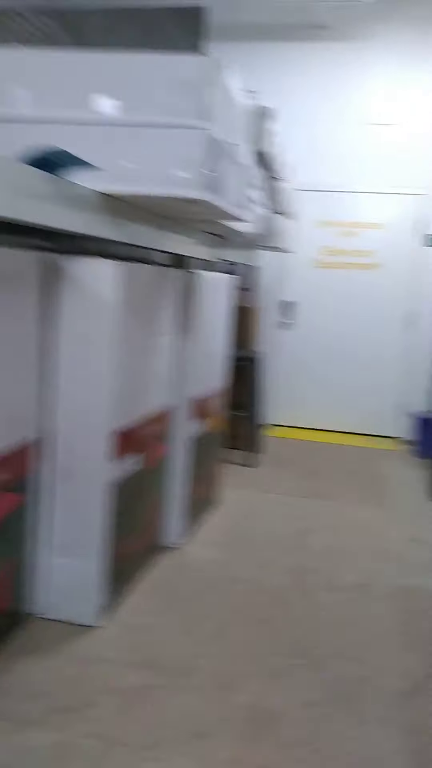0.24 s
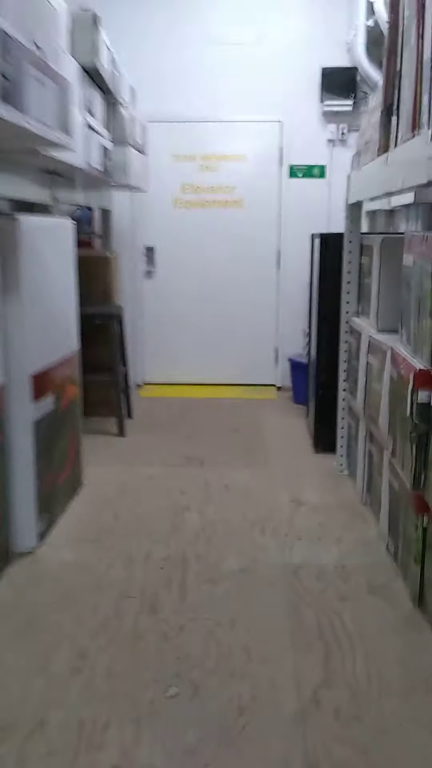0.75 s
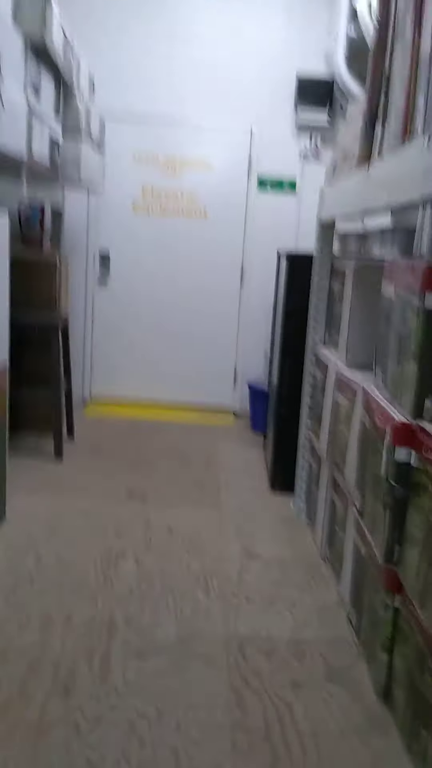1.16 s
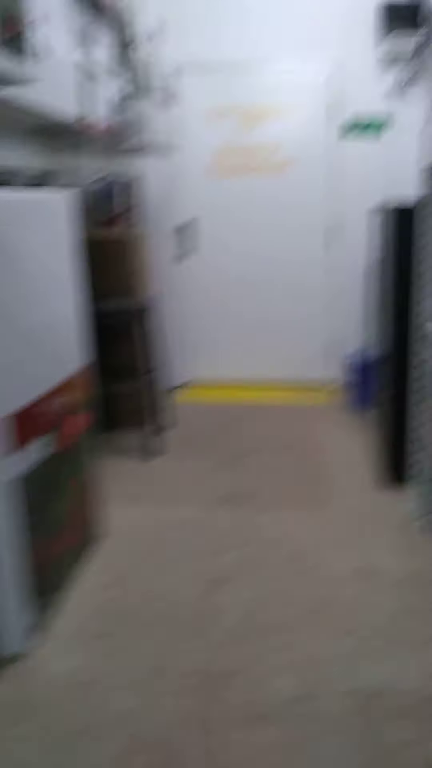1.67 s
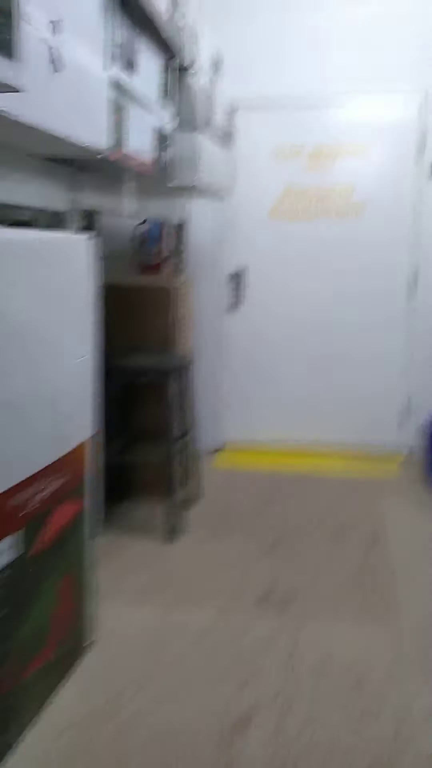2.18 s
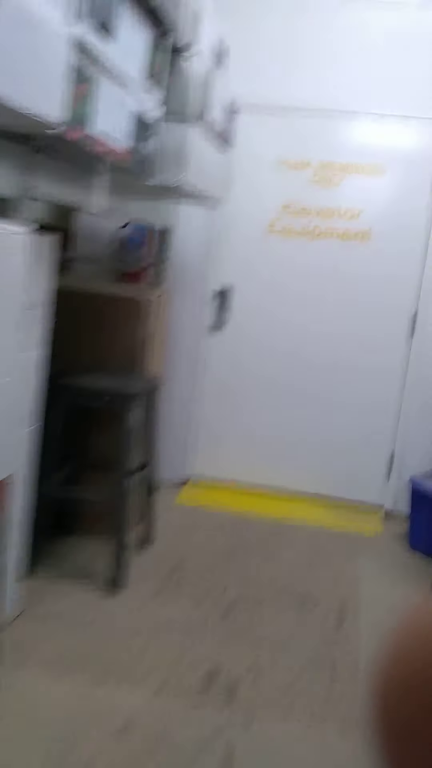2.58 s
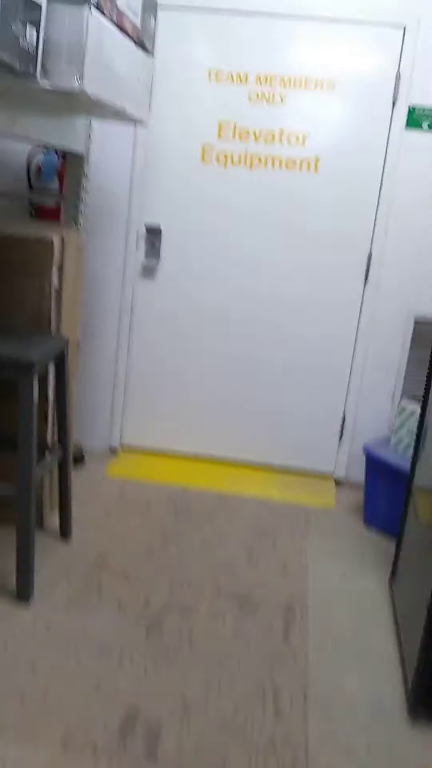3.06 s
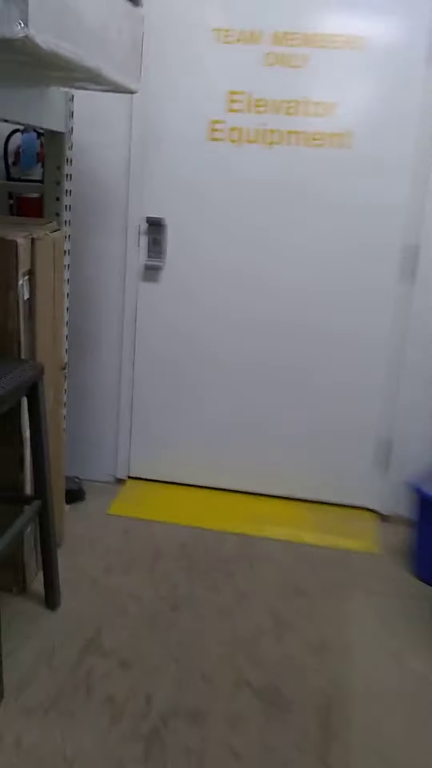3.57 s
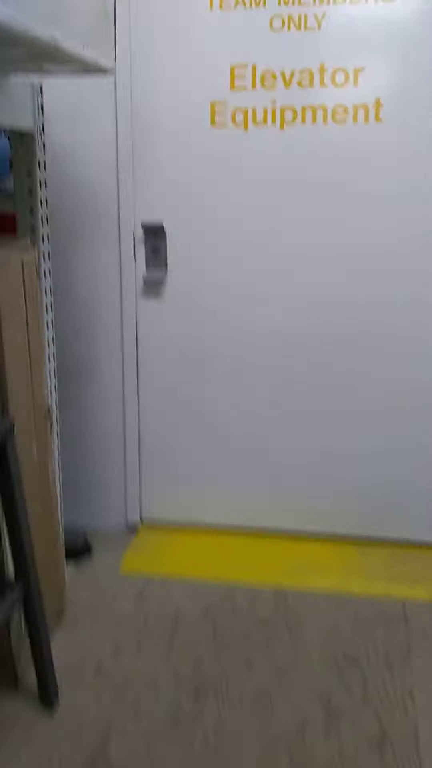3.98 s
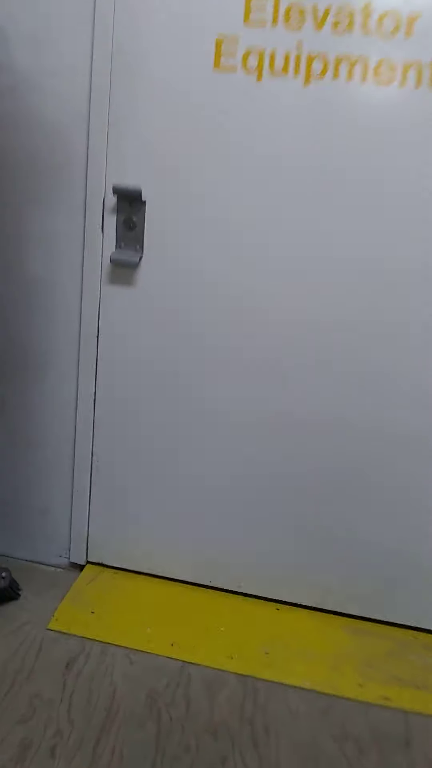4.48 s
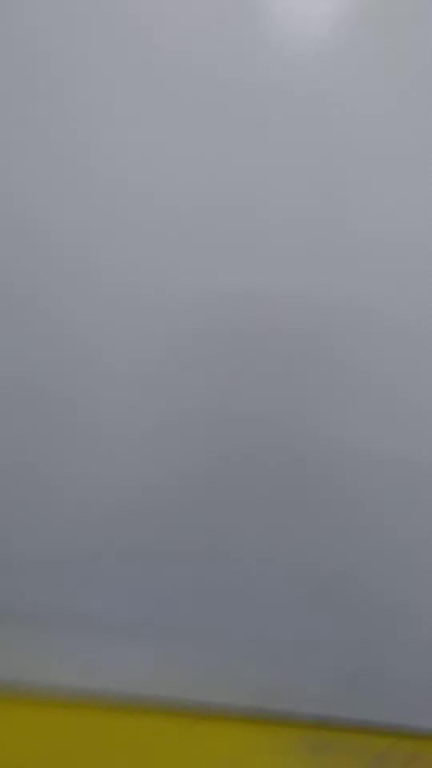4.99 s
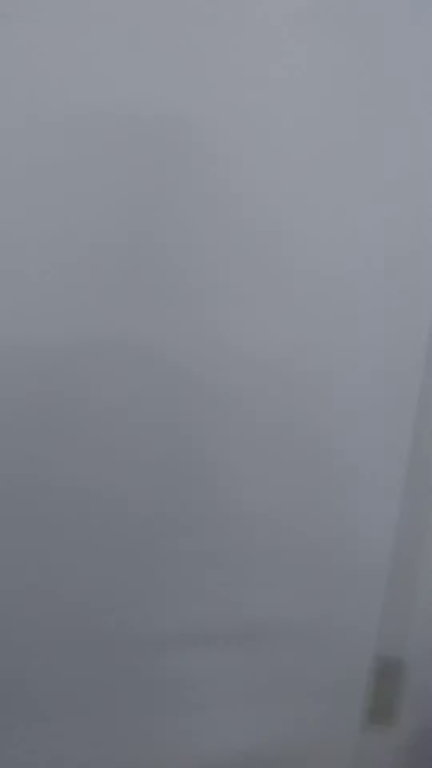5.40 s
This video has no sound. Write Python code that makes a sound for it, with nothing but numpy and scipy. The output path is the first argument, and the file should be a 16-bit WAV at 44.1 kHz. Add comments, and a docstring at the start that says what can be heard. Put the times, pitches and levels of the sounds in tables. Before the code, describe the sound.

A store cart is already rolling over a concrete stockroom floor: deep humming deck, rumbling wheels and chattering frame, surging in lurches. Knocks and dry ticks start early, a tiny squeak comes at about a quarter of the way, then hollow knocks thicken toward a hard double clack near the end. Close handheld stereo microphone with low handling rumble and short dull aisle reflections.

```python
"""A low deck drone and wheel chatter swell at once, as a cart is pushed along a concrete stockroom aisle.
Floor grain is random contact noise that drives the resonances of deck, wheels, frame and loose parts.
Rough patches make the cart lurch; bumps give knocks, modes struck by short noise bursts and clean blows.
A loose fitting ticks and a bearing squeaks once, over aisle reflections and the rumble of the carried
microphone. Two microphone ports are steered into left and right."""
import sys
import numpy as np
from scipy import signal
from scipy.fft import rfft, irfft, next_fast_len
from scipy.io import wavfile
from scipy.ndimage import uniform_filter1d

SR = 44100
rng = np.random.default_rng(int(sys.argv[2]) if len(sys.argv) > 2 else 0)


def put_to_file(sound):
    """Save the sound as 16-bit audio at rate SR, in the file named by the first command-line argument."""
    columns = np.atleast_2d(sound).T  # one column per channel
    safe = np.clip(columns, -1, 1)
    whole_steps = np.round(safe * 32767)
    wavfile.write(sys.argv[1], SR, whole_steps.astype(np.int16))


N = 248591

# Steady roll, before the offsets below: time_s, deck_drone_db, wheel_and_frame_db, loose_parts_db
STEADY_ROLL = [(0.0, -36, -40, -57), (0.24, -67, -47.5, -56.5), (0.5, -42.5, -42.5, -55.5),
               (1.0, -36.5, -40, -53.5), (1.4, -40, -39.5, -54), (1.85, -30.5, -45.5, -59),
               (2.1, -32.5, -45, -61.5), (2.5, -40, -43, -57.5), (3.0, -33.5, -39, -55),
               (3.25, -31, -46, -56.5), (3.65, -44, -44, -56.5), (3.9, -32.5, -43.5, -56),
               (4.45, -34, -43, -56.5), (4.75, -33.5, -47, -54), (4.94, -43, -53, -58.5),
               (5.25, -45, -40, -54.5), (5.64, -47, -39, -56.5)]
# Resonances of the deck: pitch_hz, width_hz, level_db
DECK_MODES = [(123.6, 8.3, 2.5), (140.2, 12.3, 1), (163.5, 12, -5), (182, 48, -10)]
# Resonances of the frame: pitch_hz, width_hz, level_db
FRAME_MODES = [(300, 30, -14), (345, 25, -22), (590, 25, -18), (705, 25, -23), (960, 35, -24),
               (1075, 28, -25), (1200, 25, -26), (1600, 18, -25), (1800, 20, -26), (1971, 12, -21),
               (2990, 35, -32), (3250, 35, -33), (3500, 35, -34), (3800, 40, -34)]
# Resonances of the loose fittings: pitch_hz, width_hz, level_db
FITTING_MODES = [(9150, 170, -6), (9470, 140, -7.5)]
# Relative spectrum of the wheels' rumble: frequency_hz, density_db (per Hz)
RUMBLE_SPECTRUM = [(60, -30.5), (110, 1), (200, -5), (300, -1), (450, -3.5), (650, -9), (1000, -24.5),
                   (2000, -75.5)]
# Relative spectrum of the clatter: frequency_hz, density_db (per Hz)
CLATTER_SPECTRUM = [(300, -6), (600, 2), (900, -1.5), (1300, -7), (1950, -4.5), (2400, -17), (2900, -14.5),
                    (4000, -32), (5400, -38), (9000, -58)]
# Relative spectrum of the rattle: frequency_hz, density_db (per Hz)
RATTLE_SPECTRUM = [(1500, -37), (3000, 5.5), (4000, 8), (5400, -3.5), (6200, 0.5), (8500, -3), (11000, 5.5),
                   (12500, 1.5), (13700, -4.5), (14200, 4.5)]
# Loose parts suddenly shaken up: start_s, level_db, t60_s
SHAKE_UPS = [(1.175, -48.5, 0.28), (2.695, -53, .3), (2.783, -49.5, 0.28), (2.817, -47.5, 0.2),
             (2.885, -50, 0.23), (3.388, -42, 0.17), (3.41, -45, 0.84), (5.098, -52, 0.25),
             (5.262, -60, 0.1)]
# Contacts of loose parts: rate_per_s, size_spread_db, smooth_share
LOOSE_PART_CONTACTS = 5000, 4.6, 0.72
WHEELS_OVER_DB, FRAME_OVER_DB = 2.5, -6  # over the steady wheel and frame column
DECK_WAVER_DB, DECK_SHIFT_DB = 2.0, 3.5  # whole drone; force on each deck mode
FRAME_JOLT_DB, LOOSE_JOLT_DB = 2.8, 3.6  # per unit of jolt
GRIT_PER_S, GRIT_DB = 90, -1.0  # coarse grit that rings the frame, level over the clatter


def rolling():
    """Forced vibration: floor grain drives the deck's low modes, the wheels, the frame and loose parts."""
    deck_db, shake_db, loose_db = in_time(STEADY_ROLL)
    steady = [deck_db + DECK_WAVER_DB * drift(11.0), shake_db + WHEELS_OVER_DB,
              shake_db + FRAME_OVER_DB, loose_db]
    crests = np.transpose(LURCH_CRESTS)[1:]
    drone_db, rumble_db, clatter_db, rattle_db = [
        lurching(db, crests_db, *slopes) for db, crests_db, slopes in zip(steady, crests, SWELL_SLOPES)]

    # Each deck mode comes and goes on its own
    deck = sum(resonate(from_db(DECK_SHIFT_DB * drift(1.8)) * contacts(740, 7.5, 13.0, 0), [mode])
               for mode in DECK_MODES)
    drone = from_db(drone_db) * evened(deck, 0.15)

    wheels = colour(from_db(rumble_db) * contacts(600, 3.74, 0.83, 0.27), RUMBLE_SPECTRUM)
    frame_force = from_db(clatter_db) * contacts(800, 2.7, 0.85, FRAME_JOLT_DB)
    grit = from_db(clatter_db + GRIT_DB) * contacts(GRIT_PER_S, 7.2, 0, 0)
    low = wheels + colour(frame_force, CLATTER_SPECTRUM)
    ringing = resonate(frame_force + grit, FRAME_MODES)

    # Lurches and shake-ups add to the steady shaking of the loose parts
    shaken_up = from_db(rattle_db) - from_db(loose_db) + fading(*np.transpose(SHAKE_UPS), attack_s=0.003)
    loose = from_db(loose_db) * contacts(*LOOSE_PART_CONTACTS, LOOSE_JOLT_DB)
    loose = loose + shaken_up * contacts(*LOOSE_PART_CONTACTS, 0)
    high = colour(loose, RATTLE_SPECTRUM)
    # Harder shaking rings the fittings more than in proportion
    jingle_db = np.clip(1.4 * (rattle_db + 53.0), -9.0, 1.5)
    jingle = resonate(loose * from_db(jingle_db), FITTING_MODES)

    panels = chatter(low, 192.5, 4321, 66.0, -31.5)
    wires = chatter(high, 5310, 9530, 11.7, -17.0, count=8)
    wires = wires + chatter(high, 2530, 7180, 78.0, -24.0, count=18)
    return drone + low + panels + ringing + jingle + high + wires


# Lurches over rough patches: crest_s, deck_db, wheels_db, frame_db, loose_parts_db
LURCH_CRESTS = [(0.08, -31.5, -41, -42.5, -72), (0.335, -52, -34, -42, -52), (0.55, -34, -47, -55, -92),
                (0.696, -28, -39.5, -36, -76), (0.888, -35.5, -68, -56, -55), (1.015, -36.5, -47, -48, -61),
                (1.205, -29, -40, -37, -43.5), (1.575, -24.5, -40, -41, -46), (1.824, -33, -47, -39.5, -76),
                (2.198, -28, -39.5, -40, -52), (2.28, -46, -37.5, -39.5, -54), (2.71, -59, -67, -48, -54),
                (2.813, -40, -48, -34, -46.5), (3.144, -40, -48, -40, -53), (3.428, -20.5, -30, -32, -41),
                (3.754, -38, -60, -46, -55), (4.001, -42, -40, -42, -63), (4.14, -61, -55, -49, -48.5),
                (4.21, -39, -38.5, -59, -79), (4.33, -44, -45, -69, -76), (4.638, -49, -29.5, -40, -79),
                (4.847, -28, -31.5, -37, -53), (5.03, -29.5, -31, -51, -60), (5.115, -35, -42, -39.5, -43),
                (5.45, -65, -38, -61, -92)]
# Slopes of a lurch; rows are deck, wheels, frame, loose parts: rise_db_per_s, fall_db_per_s
SWELL_SLOPES = [(443, 224), (233, 175), (183, 95), (350, 379)]


def lurching(steady_db, levels_db, rise, fall):
    """Superposed excitation: each lurch adds an exponential swell to the steady amplitude; returns dB."""
    age = np.arange(0, N, 32) / SR - np.transpose(LURCH_CRESTS)[0][:, None]  # one value per 32 samples
    slope_db = np.where(age < 0, -rise * age, fall * age)
    swells = from_db(levels_db[:, None] - slope_db).sum(axis=0)
    return 20 * np.log10(from_db(steady_db) + np.repeat(swells, 32)[:N])


def chatter(force, lowest_hz, highest_hz, cycles, level_db, count=36):
    """Modal density: many small panels and wires, pitch/width = cycles, each driven on and off."""
    pitches = np.geomspace(lowest_hz, highest_hz, count) * 2 ** rng.uniform(-0.069, 0.045, count)
    return sum(resonate(force * from_db(4.8 * np.minimum(drift(9.1), 1.3)), [(hz, hz / cycles, level_db)])
               for hz in pitches)


# Wheels meeting bumps, levels before the offsets in knocks():
# start_s, clatter_db, thud_db, hollow_tock_db, bright_clack_db, t60_s
BUMP_KNOCKS = [(0.592, -23.5, -41, -38, -30, 0.15), (0.715, -26, -44, -41, -42, 0.16),
               (1.012, -28.5, -39, -31, -62, 0.31), (1.198, -24.5, -36, -48, -56, 0.093),
               (1.551, -25, -46, -55, -60, 0.1), (1.753, -31, -43, -46, -39, 0.15),
               (1.92, -49, -34.5, -28, -67, 0.14), (2.265, -36, -45, -33, -64, 0.13),
               (2.547, -35.5, -51, -30, -66, 0.21), (2.785, -33, -61, -28, -52, 0.13),
               (3.3, -33.5, -41, -30, -68, 0.29), (3.422, -26, -35, -25.5, -62, 0.31),
               (3.498, -51, -35.5, -35, -32.5, 0.31), (3.518, -52, -34, -50, -60, 0.1),
               (3.608, -35.5, -35.5, -37, -66, 0.17), (4.055, -33.5, -47, -26, -39, 0.34),
               (4.134, -24, -33.5, -24, -32, 0.21), (4.233, -46, -67, -27.5, -38, 0.2),
               (4.292, -37, -38, -32, -47, 0.37), (4.558, -33.5, -38, -34, -62, 0.24),
               (4.568, -41, -35.5, -24.5, -37, 0.2), (4.619, -20.5, -31.5, -34, -23.5, 0.17),
               (4.631, -24, -23.5, -44, -42, 0.053), (4.642, -21, -20.5, -44, -48, 0.045),
               (4.988, -24.5, -54, -40, -58, 0.04), (5.1, -27, -46, -48, -28, 0.21),
               (5.43, -35, -47, -24, -50, 0.1), (5.442, -51, -35, -49, -64, 0.081)]
# Thud resonance: pitch_hz, width_hz, level_db
THUD_MODES = [(301, 20.4, 4.5)]
# Hollow tock of the wheels: pitch_hz, width_hz, level_db
TOCK_MODES = [(1003, 240, -7), (1297, 390, -11.5)]
# Bright clack: pitch_hz, width_hz, level_db
CLACK_MODES = [(2765, 47, -3), (3150, 130, 0), (3530, 89, -6), (4050, 130, -4)]
CLACK_SHARE = 0.81  # of the knock's t60
RING_OVER_DB = 4.5  # force on the frame modes over the clatter


def knocks():
    """Impact excitation: a bump jolts wheels and frame and sets their modes ringing."""
    s, clatter_db, thud_db, tock_db, bright_db, t60 = np.transpose(BUMP_KNOCKS)
    jolt = bursts(s, thud_db, 1.12 * t60)
    thud = colour(jolt, RUMBLE_SPECTRUM) + resonate(jolt + taps(s, thud_db), THUD_MODES)
    tock = resonate(bursts(s, tock_db, t60) + taps(s, tock_db), TOCK_MODES)
    clack_force = bursts(s, bright_db - 11.5, CLACK_SHARE * t60) + taps(s, bright_db - 6.0)
    clack = resonate(clack_force, CLACK_MODES)
    clatter = colour(bursts(s, clatter_db, t60), CLATTER_SPECTRUM)
    return thud + tock + clatter + clack + strikes(s, clatter_db + RING_OVER_DB)


RING_SCATTER_DB = 3.0


def strikes(times, levels_db):
    """Modal participation: each blow lands elsewhere, so it wakes every frame mode differently."""
    out = 0
    luck = rng.standard_normal((len(times), len(FRAME_MODES)))
    force = rng.standard_normal((2, N))
    for k, mode in enumerate(FRAME_MODES):
        blows = fading(times, levels_db + RING_SCATTER_DB * luck[:, k], 0.025 + 0 * times)
        out = out + resonate(force * blows, [mode])
    return out


TAP_OVER_DB = 13.0  # over the level given to taps()


def taps(times, levels_db):
    """Unit-impulse excitation: one clean blow at each time, the same at both ports."""
    out = np.zeros((2, N))
    out[:, np.round(times * SR).astype(int)] = from_db(levels_db + TAP_OVER_DB)
    return out


ATTACK_S = 0.001  # time constant of the rise
BOUNCES_PER_S, BOUNCE_SHARE = 450, 0.9  # small impacts inside a blow
FIRST_HIT_DB, FIRST_HIT_T60_S = 1, 0.005  # first contact, level over the rest


def bursts(times, levels_db, t60s):
    """Multiple impact: noise with small separate hits, a hard first contact, then exponential decay."""
    bounces = rms_one(rng.standard_normal((2, N)) * (rng.random(N) < BOUNCES_PER_S / SR))
    first_t60s = FIRST_HIT_T60_S + 0 * times
    shape = fading(times, levels_db, t60s)
    shape = shape + fading(times, levels_db + FIRST_HIT_DB, first_t60s, attack_s=ATTACK_S / 2)
    return shape * rms_one(rng.standard_normal((2, N)) + BOUNCE_SHARE * bounces)


# Dry ticks of a loose fitting: start_s, crack_db, body_db, body_hz
FITTING_TICKS = [(0.379, -29.5, -49, 3140), (0.881, -30.5, -60, 3190), (1.1031, -23, -24, 3720),
                 (1.826, -38, -34, 3360), (4.9835, -24.5, -31.5, 3280), (5.0515, -39, -50, 3270),
                 (5.266, -42, -46, 2850)]
# Relative spectrum of the crack: frequency_hz, density_db (per Hz)
CRACK_SPECTRUM = [(2000, -5), (3500, -5.5), (6000, -6), (8500, 1.5), (11000, 0.5), (14000, -13)]
CRACK_T60_S, BODY_T60_S, BODY_WIDTH_HZ = 0.01, 0.015, 380


def ticks():
    """Short-contact impact: a brief bright crack excites a small, heavily damped body."""
    s, crack_db, body_db, body_hz = np.transpose(FITTING_TICKS)
    crack_shape = fading(s, crack_db, CRACK_T60_S + 0 * s, attack_s=0.00046)
    out = colour(crack_shape * rng.standard_normal((2, N)), CRACK_SPECTRUM)
    noise = rng.standard_normal((2, N))
    for at, level_db, hz in zip(s, body_db, body_hz):
        body_force = noise * fading([at], [level_db], [BODY_T60_S], attack_s=0.00059)
        out += resonate(body_force, [(hz, BODY_WIDTH_HZ, 0)])
    return out


# Brief squeak of a wheel bearing: time_s, pitch_hz, level_db (peak)
BEARING_SQUEAK = [(1.43, 790, -52), (1.447, 730, -37), (1.468, 640, -33), (1.492, 612, -36),
                  (1.52, 650, -48)]


def squeak():
    """Frequency modulation: a short sine whose phase is the running sum of its gliding pitch."""
    s, hz, level_db = np.transpose(BEARING_SQUEAK)
    t = np.arange(N) / SR
    phase = 2 * np.pi * np.cumsum(np.interp(t, s, hz)) / SR
    gain = from_db(np.interp(t, s, level_db, -120, -120))
    return gain * np.array([np.sin(phase), np.sin(phase)])


AISLE_T60_S, AISLE_DB = 0.48, -15


def aisle(x):
    """Diffuse reverberation: dense dull reflections off shelves and walls, as decaying low-passed noise."""
    age = np.arange(SR // 2) / SR
    tail = rng.standard_normal((2, SR // 2)) * from_db(-60 * age / AISLE_T60_S)
    tail = tail * (age > .006)  # gap before the first reflection
    tail = signal.lfilter([1], [1, -.6], tail)
    return from_db(AISLE_DB) * signal.fftconvolve(x, tail / np.linalg.norm(tail[0]), axes=1)[:, :N]


# Rumble of the carried microphone: time_s, level_db
HANDLING_LEVEL = [(0, -48), (0.7, -53), (1.7, -44), (2.2, -50), (2.8, -43.5), (3.7, -50), (4.3, -52),
                  (4.6, -46), (5.64, -41.5)]


def handling():
    """Structure-borne noise: low lumpy rumble of the carried microphone, as band-passed noise."""
    band = signal.butter(2, [30, 68], "band", fs=SR, output="sos")
    low = signal.sosfilt(band, rng.standard_normal((2, N)))
    return from_db(in_time(HANDLING_LEVEL)[0]) * rms_one(low)


def contacts(per_s, spread_db, smooth, jolt_db):
    """Asperity contact: random impacts over smooth friction, swelled by jolts that die away; rms 1."""
    sizes = from_db(spread_db * np.minimum(rng.exponential(1, (2, N)), 3.0)) * rng.choice([-1, 1], (2, N))
    grains = rms_one(sizes * (rng.random((2, N)) < per_s / SR))
    kicks = rng.exponential(1, N) * (rng.random(N) < 22 / SR) + 1e-18  # 22 per s on average
    jolts = signal.lfilter([1], [1, -np.exp(-45 / SR)], kicks)
    friction = smooth * rng.standard_normal((2, N))
    return rms_one((grains + friction) * from_db(jolt_db * np.minimum(jolts, 2)))


def resonate(x, modes):
    """Modal superposition: parallel two-pole resonances, each passing white noise at its dB."""
    out = 0
    for k, (hz, width, level_db) in enumerate(modes):
        r = np.exp(-np.pi * width / SR)
        b = from_db(level_db) * np.sqrt((1 - r * r) / 2) * np.array([1, 0, -1])
        mode = signal.lfilter(b, [1, -2 * r * np.cos(2 * np.pi * hz / SR), r * r], x)
        out = out + (-1) ** k * mode
    return out


def colour(x, spectrum, size=4096):
    """Minimum-phase filtering: phase from the folded cepstrum; white noise keeps its rms."""
    cepstrum = irfft(np.log(from_db(at_hz(spectrum, np.fft.rfftfreq(size, 1 / SR)))))
    cepstrum[1:size // 2] *= 2
    cepstrum[size // 2 + 1:] = 0
    response = irfft(np.exp(rfft(cepstrum)))
    return signal.fftconvolve(x, response[None] / np.linalg.norm(response))[:, :N]


def fading(times, levels_db, t60s, attack_s=ATTACK_S):
    """Exponential decay: envelope that starts fast and dies away, cut off at its t60."""
    shape = np.zeros(N) + 1e-12
    for s, level_db, t60 in zip(times, levels_db, t60s):
        at = round(s * SR)
        age = np.arange(min(N - at, round(t60 * SR))) / SR
        shape[at:at + len(age)] += from_db(level_db - 60 * age / t60) * (1 - np.exp(-age / attack_s))
    return shape


def drift(pole_hz):
    """Random modulation: noise through a double low-pass pole, rms 1, made at SR / 40."""
    r = np.exp(-80 * np.pi * pole_hz / SR)
    slow = signal.lfilter([1], [1, -2 * r, r * r], rng.standard_normal(N // 40 + 2002))[2000:]
    return np.interp(np.arange(N) / 40, np.arange(len(slow)), rms_one(slow))


def evened(x, over_s):
    """Level normalization: slow chance swings are divided out by the running rms."""
    return x / np.sqrt(uniform_filter1d(np.mean(x ** 2, axis=0), int(over_s * SR)) + 1e-20)


def from_db(db):
    """Amplitude ratio of a level in dB."""
    return 10 ** (np.asarray(db) / 20)


def rms_one(x):
    """Power normalization: scaled to rms 1."""
    return x / np.sqrt(np.mean(x ** 2) + 1e-20)


def in_time(rows):
    """Linear interpolation of each column, sample by sample."""
    s, *columns = np.transpose(rows)
    return [np.interp(np.arange(N) / SR, s, c) for c in columns]


def at_hz(points, hz, axis=1):
    """Interpolation of a column on a log-frequency axis."""
    return np.interp(np.log(hz + 1), np.log(np.array(points)[:, 0]), np.array(points)[:, axis])


def scene():
    """Linear superposition of all sources at the two ports."""
    hits = knocks() + ticks() + squeak()
    return rolling() + hits + aisle(hits) + handling()


# The two ports: frequency_hz, first_over_second_db, share_taken_away (of the other port),
# left_over_right_db (after that)
PORT_RESPONSE = [(30, 7, 0.01, -4), (60.3, 11, 0.046, 2.5), (362, 0.5, 0.014, 4.5), (764, 4.5, 0.45, 0.5),
                 (1430, 1, 0.91, 2), (1580, 16, 1, 4), (2350, 8, 1, 0.5), (4300, 5.5, 0.49, -4),
                 (8100, 3.5, 0.32, -1.5), (11200, 5.5, 0.39, -0.5), (12400, -21, 0.94, 2.5)]
PORT_LAG_S, BASS_LIKENESS, CUTOFF_HZ = .000446, 0.4, 14250


def record(dry):
    """Delay-and-subtract beamforming: mostly above the bass, each port loses the other; the top is cut."""
    size = next_fast_len(N + 4096)
    hz = np.fft.rfftfreq(size, 1 / SR)
    over = from_db(at_hz(PORT_RESPONSE, hz))
    share = np.clip(at_hz(PORT_RESPONSE, hz, axis=2), 0, 1)
    first, second = rfft(dry, size)
    second = (second + BASS_LIKENESS * (1 - share) * first) / over  # long waves reach both ports alike
    late = share * np.exp(-2j * np.pi * hz * PORT_LAG_S)
    left = first - late * second
    right = (second - late * first) / from_db(at_hz(PORT_RESPONSE, hz, axis=3))
    even = np.sqrt(1 + (share / over) ** 2)  # offsets the power that subtraction adds
    steered = irfft(np.array([left, right]) / even, size)[:, :N]
    top_cut = signal.ellip(12, .5, 55, CUTOFF_HZ, fs=SR, output="sos")
    return signal.sosfilt(top_cut, steered)


dry = scene()
out = record(dry)
put_to_file(out)
```